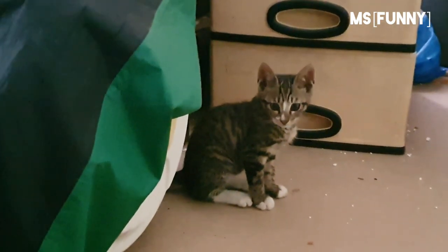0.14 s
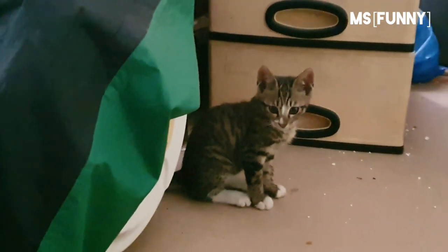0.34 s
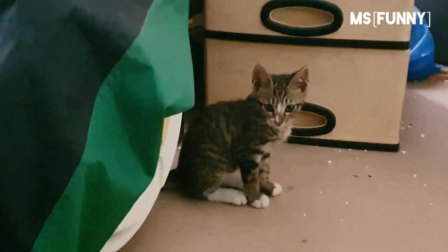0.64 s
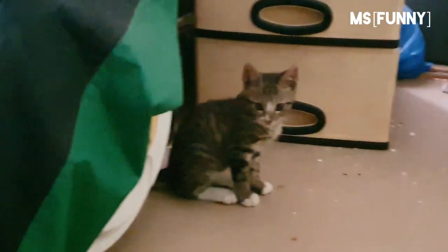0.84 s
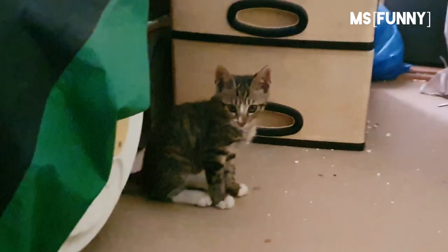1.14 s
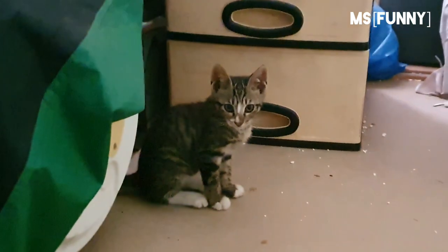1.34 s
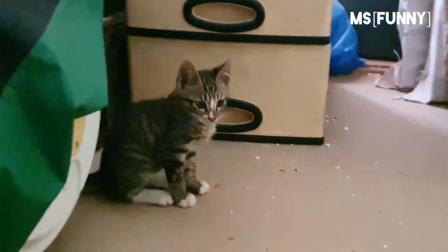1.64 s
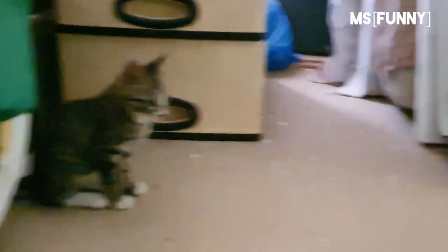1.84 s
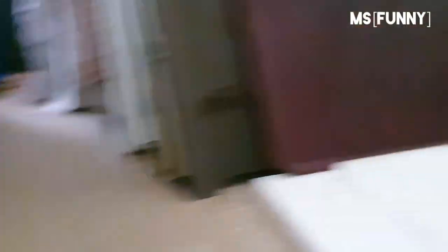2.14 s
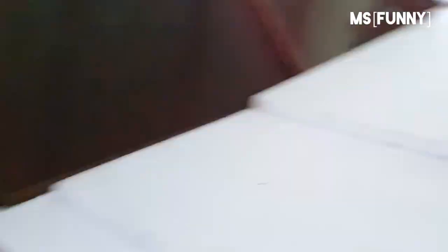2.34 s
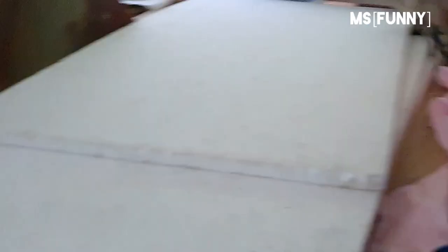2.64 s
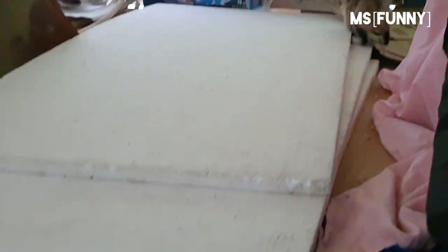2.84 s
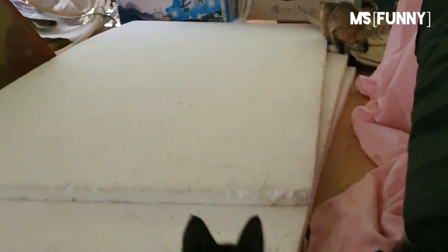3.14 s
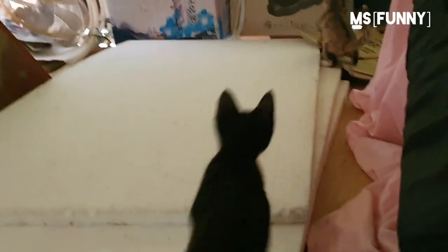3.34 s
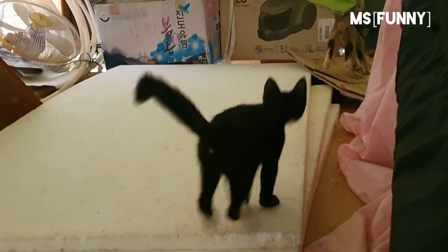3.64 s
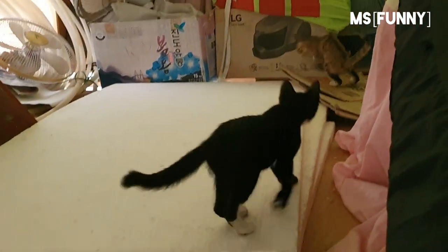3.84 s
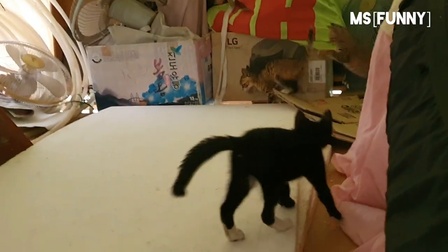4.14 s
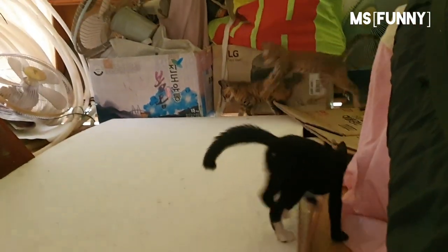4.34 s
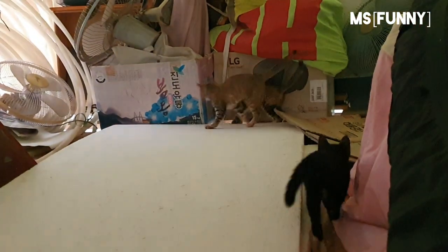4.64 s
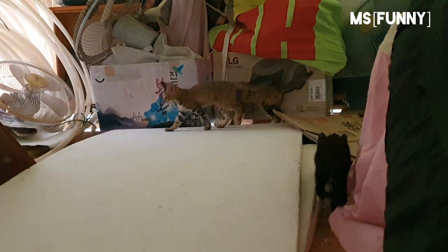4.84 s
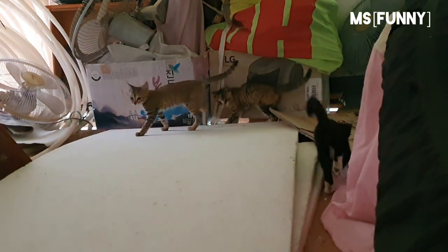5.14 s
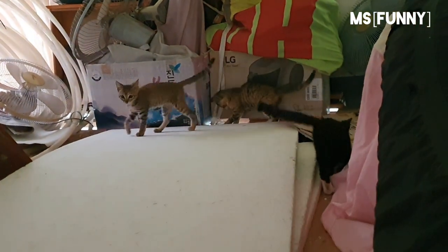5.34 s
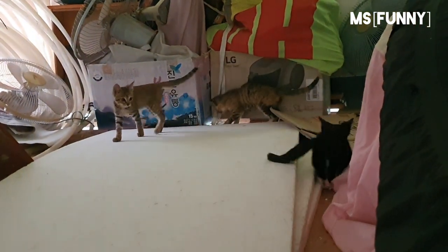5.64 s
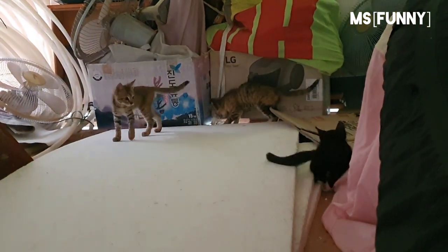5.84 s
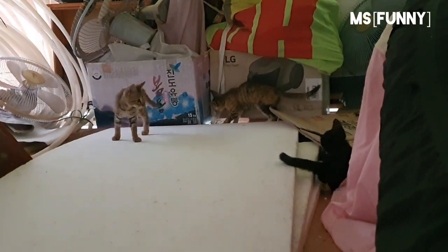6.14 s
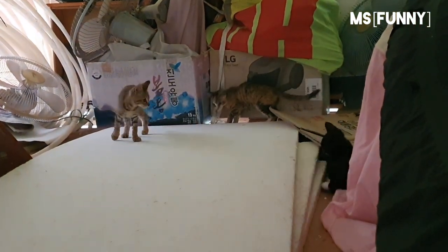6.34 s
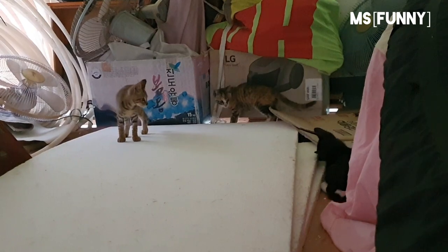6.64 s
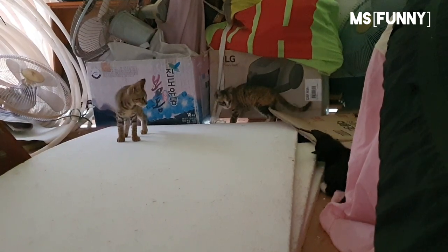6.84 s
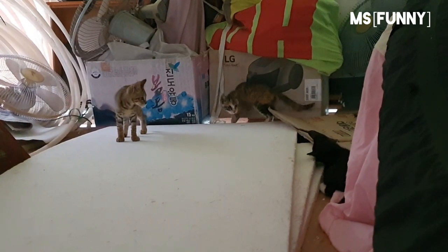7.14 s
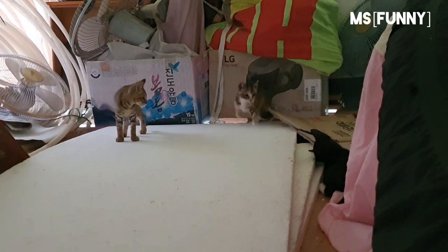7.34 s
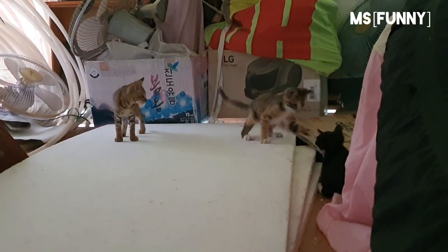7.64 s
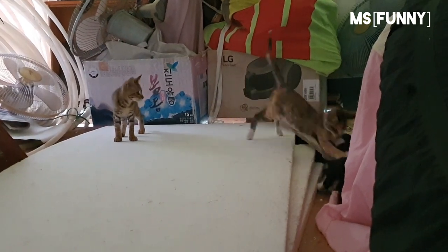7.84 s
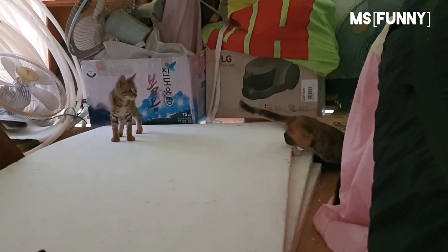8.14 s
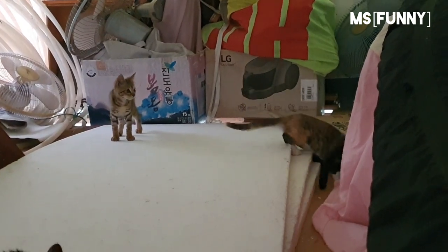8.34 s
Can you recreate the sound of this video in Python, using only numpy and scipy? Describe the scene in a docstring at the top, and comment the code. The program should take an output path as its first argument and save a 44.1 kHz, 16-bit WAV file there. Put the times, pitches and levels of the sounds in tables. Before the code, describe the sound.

In a quiet cluttered room, faint kitten scuffs and bumps come first. Around one and a half seconds the phone creaks in the grip, a finger hisses along it and sharp knocks follow. Then kittens scramble over hollow boards and bedding with thumps, rustles and claw ticks above low handling rumble. One hard knock hits at five seconds, calm follows, then a last burst of scuffling.

```python
"""Scuffs, hollow bumps and tiny ticks: kittens scramble over boards, boxes and bedding in a cluttered storeroom.
Paws ring the modes of boards, boxes and card; scuffs and fur are grainy noise strokes, claws short bright noise.
A handheld phone rumbles, creaks and knocks in the grip, made of lumpy low noise and pulses ringing its case.
A finger slides along it as swelling hiss; beneath lie room air, port hiss and a faint drone of filtered noise."""
import sys
import numpy as np
from scipy import signal
from scipy.fft import rfft, irfft, next_fast_len
from scipy.io import wavfile

SR = 44100
rng = np.random.default_rng(int(sys.argv[2]) if len(sys.argv) > 2 else 0)


def file_out(sig):
    """Save sig as 16-bit WAV at sys.argv[1]."""
    # one column per channel
    cols = np.atleast_2d(sig).T
    # limit, then scale
    lim = np.clip(cols, -1, 1)
    pcm = np.round(lim * 32767).astype(np.int16)
    wavfile.write(sys.argv[1], SR, pcm)


N = 373968
TIME = np.arange(N) / SR

# Likeness of the two ports. Each row: frequency in Hz, left-right correlation from 0 to 1.
PORT_LIKENESS = [(100, 0.98), (500, 0.82), (1200, 0.078), (12000, 0.082)]
# Nearby surfaces ripple the spectrum of each stroke differently: depth, and spacing of the ripple.
RIPPLE_DB, RIPPLE_HZ = 2.8, 130

# Still room air. Each row: frequency in Hz, relative level in dB per Hz.
AIR_COLOUR = [(20, -18), (220, -7.5), (300, -11), (640, -12), (840, -8.5), (1100, -14.5), (4000, -25.5),
              (10000, -19), (16000, -28)]
# The right port hisses on its own.
HISS_BAND_HZ, HISS_DB = (2130, 5370), -70.5
# A faint far drone that swells. Each row: time in seconds, level in dB.
DRONE_LEVEL = [(5.62, -85), (5.76, -68), (5.93, -63), (6.45, -90.5), (8.2, -65)]
DRONE_HZ, DRONE_WIDTH_HZ = 420, 150

# Paws pushing off on cloth and card.
# Each row: time of the peak in seconds, level in dB, rise in seconds, treble tilt in dB per octave.
PUSHES = [(0.342, -50, 0.014, 2), (.414, -52, 0.017, 1.5), (0.488, -43.5, 0.03, 1), (0.932, -50, .007, 4.5),
          (1.061, -55.5, 0.026, 2.5), (1.323, -45.5, .017, 2.4), (1.448, -53.5, 0.021, 4),
          (2.629, -43.5, 0.045, 3), (2.702, -41.5, 0.045, 2), (2.796, -38.5, 0.019, 2.3),
          (3.112, -50, 0.006, 1), (3.396, -43, 0.02, 1.5), (3.491, -38.5, 0.023, 3.5),
          (3.657, -37, 0.044, 2.5), (3.809, -45.5, 0.038, 1), (4.056, -46, 0.038, -0.5),
          (4.228, -47.5, 0.029, 7.5), (4.457, -33.5, .04, 0), (4.72, -38, 0.043, -0.5),
          (5.18, -47.5, 0.036, 0.7), (5.424, -47, 0.02, -0.4), (7.427, -42.5, 0.035, 3),
          (7.61, -34.5, 0.027, -0.5), (7.648, -35.5, 0.022, 2.5), (7.97, -36, 0.029, 3),
          (8.291, -57.5, 0.076, 4)]
# Colour of paws and fur on cloth and card. Each row: frequency in Hz, relative level in dB per Hz.
STROKE_COLOUR = [(100, 14), (350, 14), (580, 17), (850, 11.5), (1250, 6.5), (2000, 4.5), (2700, 4.5),
                 (3700, 2.5), (4800, 4.5), (6200, -3.5), (8000, -1), (13500, 0), (16000, -7.5)]
# A push of the reference level dies in PUSH_T60_S; every 10 dB gentler, it lingers LINGER times as long.
PUSH_DB, PUSH_T60_S, LINGER = -46, 0.2, 0.85
# The clutter scatters each stroke back as a faint tail.
SCATTER_DB, SCATTER_T60_S = -8, 0.49
# Above this the phone shades the left port.
SHADE_HZ = 3000

# Claws catching. Each row: start in seconds, level in dB before the trim in claws().
CLAW_CATCHES = [(0.3359, -35.5), (3.315, -33.5), (3.3783, -28.5), (4.024, -32)]
# Colour of a claw. Each row: frequency in Hz, relative level in dB per Hz.
CLAW_SPECTRUM = [(700, -24), (4000, -10), (14000, 1)]

# Paws landing on boards and boxes.
# Each row: start in seconds, level in dB, centre in Hz, spread in octaves.
LANDINGS = [(0.497, -43, 414, 0.28), (0.762, -49, 111, 1.1), (0.943, -42, 288, 0.65),
            (0.962, -34.5, 109.4, 0.38), (1.049, -47, 243, 1.06), (2.604, -49, 770, 0.6),
            (2.628, -43.5, 150, 2.1), (2.689, -43, 81.6, 1.6), (2.8, -46.5, 201, 2.3),
            (2.963, -44, 94, 0.47), (3.378, -29, 104, 0.72), (3.453, -34.5, 240, 1.13),
            (3.656, -41, 184, 1.2), (3.718, -36.5, 263, 0.51), (3.75, -37.5, 128, 1.13),
            (3.8, -47, 400, 0.86), (3.995, -40, 202, 0.34), (4.088, -43.5, 68.6, 0.54),
            (4.235, -52.5, 182, 0.34), (4.425, -35, 220, 1.16), (4.652, -42.5, 216.7, 1.93),
            (4.693, -35.5, 238, 1.6), (5.062, -44, 212, 1.2), (6.815, -53.5, 305, 0.94),
            (7.259, -53.5, 202.8, 1.1), (7.406, -47, 266, 1.3), (7.61, -28.5, 264.2, 1.61),
            (7.688, -41.5, 115, 1.7), (7.964, -36, 360, 1.2), (7.987, -35.5, 99.6, 0.4)]
# Ring of the boards and boxes. Each row: frequency in Hz, relative level in dB, 60 dB decay in seconds.
PANEL_MODES = [(42.2, 11.5, 0.5), (74.7, 6, 0.27), (93.1, -3, 0.33), (125.3, -1.5, 0.36), (169, 0.5, 0.09),
               (218.3, 2, 0.064), (265, -3, 0.038), (353.8, 2.5, 0.071), (440, 0, 0.014), (604, 4, 0.021),
               (790, 1, 0.067)]
# Contact at a one-octave spread; a wider landing stays on longer, by this power of its spread.
CONTACT_S, SPRAWL_POWER = 0.018, 0.24
# The narrower the spread against THUD_SPREAD, the more thud; its envelope peaks after THUD_CYCLES.
THUD_SPREAD, THUD_CYCLES = 0.47, 1.39

# Bodies brushing along the bedding, each a run of small random strokes.
# Each row: start in seconds, end in seconds, level in dB, treble tilt in dB per octave.
FUR_RUNS = [(0.637, .73, -60.5, 3), (0.972, 1.17, -63, 2), (1.272, 1.3, -51.5, -0.5), (3.191, 3.47, -50, 4),
            (3.615, 3.93, -57.5, 2), (4.523, 4.86, -51, 1.5), (5.072, 5.17, -53, -0.1),
            (5.499, 5.73, -62.5, 3), (6.003, 6.2, -60, 6), (6.876, 6.99, -66, 11), (7.473, 7.88, -53.5, 1)]
STROKES_PER_S, STROKE_RISE_S, STROKE_T60_S, STROKE_UNEVEN_DB = 40, .009, 0.23, 2
# Share of the small strokes in which a claw snags, its level above the stroke, its decay.
SNAG_SHARE, SNAG_DB, SNAG_T60_S = .2, 12, 0.008

# Sharp hits on the phone case: the first is the creak's opening slip, the rest are knocks.
# Each row: time of the pulse turning round in seconds, peak in dB, snap in Hz, case ring in dB beside the snap.
CASE_HITS = [(1.534, -24.5, 780, 2), (2.192, -20.5, 535, -5), (2.3225, -16, 988, -16),
             (2.386, -26.5, 720, -11), (2.413, -30, 826, -14), (2.6261, -11, 527, -17),
             (2.7537, -21, 1044, -22), (2.8637, -19.5, 975, -17), (5.003, -9.5, 828.2, -18),
             (5.011, -19.5, 711, 25)]
# Ring of the phone case. Each row: frequency in Hz, relative level in dB, 60 dB decay in seconds.
CASE_RING = [(89, -0.5, 0.15), (236, 12, 0.022), (483, 7.5, 0.0072)]
# Ring of the small port cavity. Each row: frequency in Hz, relative level in dB.
CAVITY_MODES = [(2900, 28), (11500, 16.5)]
CAVITY_T60_S = 0.00071
# After its opening slip the case creaks in a quickening run: each gap is a share of the one before.
CREAK_START_S, FIRST_GAP_S, GAP_SHARE = 1.559, .035, .885

# A finger sliding by the port. Each row: time in seconds, level in dB.
SLIDE_LEVEL = [(0, -100), (1.5, -80), (2.05, -62.5), (2.46, -57), (3, -106)]
# Hiss of skin on the case. Each row: frequency in Hz, relative level in dB per Hz.
SKIN_COLOUR = [(200, 7), (1300, -12), (4800, -2.5), (6500, -11), (9000, -10), (12500, 0), (16000, -9)]

# The hand carries the phone over the boards. Each row: time in seconds, rumble level in dB.
CARRY_LEVEL = [(2.3, -78), (2.75, -52.5), (3.3, -49.5), (3.9, -51.5), (4.3, -55), (4.85, -55.5), (5.4, -79)]
# Colour of the handling. Each row: frequency in Hz, relative level in dB per Hz.
HAND_COLOUR = [(55, -2), (130, -10.5), (300, -19), (4000, -41.5)]

# Paws slapping down on card. Each row: start in seconds, peak in dB.
CARD_SLAPS = [(3.378, -29.5), (3.453, -26.5), (4.424, -43), (7.262, -49.5), (7.593, -38.5)]
# Ring of the card. Each row: frequency in Hz, relative level in dB. Each mode dies in CARD_CYCLES cycles.
CARD_RING = [(592, -10), (1040, -6.5), (1280, -6.5), (1700, 0.5), (3700, 7.5)]
CARD_CYCLES = 20

# Upper limit of the sound's band.
CUTOFF_HZ = 16100


def from_db(db):
    """Decibels to gain."""
    return 10 ** (np.asarray(db) / 20)


def rms_one(x):
    """Scale to unit rms."""
    return x / np.sqrt(np.mean(x ** 2) + 1e-20)


def lean(right_db):
    """Channel gains for a source that favours the right port."""
    return from_db(np.array([[-right_db], [right_db]]) / 2)


def add(out, s, sound):
    """Mix a sound in, starting at time s."""
    start = round(s * SR)
    lo, hi = max(start, 0), min(start + sound.shape[-1], N)
    out[..., lo:hi] += sound[..., lo - start:hi - start]


def at_hz(points, hz):
    """Read a table on a log-frequency axis."""
    f, value = np.transpose(points)
    return np.interp(np.log(hz), np.log(f), value)


def ride(points):
    """Gain that follows a table of times and levels in dB."""
    return from_db(np.interp(TIME, *np.transpose(points)))


def two_ports(mid, side, hz):
    """Blend shared and opposed sound into two ports, as alike as PORT_LIKENESS gives at hz."""
    alike = np.clip(at_hz(PORT_LIKENESS, hz), 0, 1)
    return np.sqrt(1 + alike) * mid + np.sqrt(1 - alike) * side * [[1], [-1]]


def ring(x, hz, t60):
    """A damped mode: a unit click rings it with height about 1."""
    r, w = from_db(-60 / (t60 * SR)), 2 * np.pi * hz / SR
    return signal.lfilter([0, np.sin(w)], [1, -2 * r * np.cos(w), r * r], x + 1e-18)


def noise(colour, size, tilt_db=0, ripple_db=0):
    """Coloured stereo noise with a random ripple in its spectrum, alike at both ports in the bass; rms 1."""
    n = next_fast_len(size)
    hz = np.maximum(np.fft.rfftfreq(n, 1 / SR), 20)
    mid, side = rfft(rng.standard_normal((2, n)))
    knots = np.arange(0, SR / 2, RIPPLE_HZ)
    ripple = ripple_db * np.interp(hz, knots, rng.standard_normal(len(knots)))
    shape_db = at_hz(colour, hz) + tilt_db * np.log2(hz) + ripple
    return rms_one(irfft(two_ports(mid, side, hz) * from_db(shape_db), n)[:, :size])


def grain(size, per_s, depth_db):
    """Gain of a surface that catches and lets go at random; rms 1."""
    steps = rng.standard_normal(int(size / SR * per_s) + 2)
    place = np.arange(size) / SR * per_s
    return rms_one(from_db(depth_db * np.interp(place, np.arange(len(steps)), steps)))


def background(air_db=-70):
    """Still room air, the hiss of the right port and a far drone in one broad resonance."""
    air = from_db(air_db) * noise(AIR_COLOUR, N) * lean(right_db=3.0)
    port = signal.butter(2, HISS_BAND_HZ, "band", fs=SR, output="sos")
    air[1] += from_db(HISS_DB) * rms_one(signal.sosfilt(port, rng.standard_normal(N)))
    edges_hz = [DRONE_HZ - DRONE_WIDTH_HZ / 2, DRONE_HZ + DRONE_WIDTH_HZ / 2]
    resonance = signal.butter(2, edges_hz, "band", fs=SR, output="sos")
    drone = rms_one(signal.sosfilt(resonance, noise(AIR_COLOUR, N)))
    return air + ride(DRONE_LEVEL) * drone


def stroke(db, rise, t60, tilt_db, fibre_db=1.3, catch_db=1.6):
    """A stroke gathers speed from rest, then dies away; fibres catching make it grainy."""
    t = np.arange(-rise, .45, 1 / SR)
    dying = np.hypot(from_db(-60 * t / t60), from_db(SCATTER_DB - 60 * t / SCATTER_T60_S))
    speed = np.where(t < 0, 1 + t / rise, dying)
    fibres = grain(len(t), 900, fibre_db) * grain(len(t), 110, catch_db)
    return from_db(db) * speed * fibres * noise(STROKE_COLOUR, len(t), tilt_db, RIPPLE_DB)


def scuffs():
    """Paws push off on cloth and card, each push one stroke whose decay time follows its force."""
    out = np.zeros((2, N))
    for s, db, rise, tilt_db in PUSHES:
        t60 = PUSH_T60_S * LINGER ** ((PUSH_DB - db) / 10)
        add(out, s - rise, stroke(db, rise, t60, tilt_db))
    return out


def claws(t60=0.0073, tail_db=-17, tail_t60=0.86, level_db=-5):
    """Tiny bright ticks with a faint scatter from the clutter."""
    out, t = np.zeros((2, N)), TIME[:SR // 4]
    fade = from_db(-60 * t / t60) + from_db(tail_db - 60 * t / tail_t60)
    for s, db in CLAW_CATCHES:
        add(out, s, from_db(db + level_db) * fade * noise(CLAW_SPECTRUM, len(t)))
    return out * lean(right_db=10.0)


def bumps(ring_s=0.025):
    """A neat landing thuds at the pitch of the panel under the paw; a sprawling one stirs the modes around it."""
    out, t = np.zeros((2, N)), TIME[:SR // 2]
    for s, db, centre_hz, spread in LANDINGS:
        contact = CONTACT_S * spread ** SPRAWL_POWER
        push = np.exp(-t / contact / 2)
        boom = np.zeros((2, len(t)))
        for hz, mode_db, t60 in PANEL_MODES:
            mid, side = ring(push * rng.standard_normal((2, len(t))), hz, t60)
            # modes far from the centre are hardly stirred
            reach = 1 / (1 + (np.log2(hz / centre_hz) / spread) ** 2 / 2) ** 2
            boom += from_db(mode_db) * reach * two_ports(rms_one(mid), rms_one(side), hz)
        cycles = t * centre_hz
        thud = cycles * np.exp(-cycles / THUD_CYCLES) * np.sin(2 * np.pi * cycles)
        thud_share = THUD_SPREAD / spread / (1 + spread ** 2)
        landing = rms_one(boom) + thud_share * rms_one(thud)
        # the level counts over the contact and the ring after it
        add(out, s, from_db(db) * rms_one(landing) * np.sqrt((2 * contact + ring_s) / t[-1]))
    return out


def brushes():
    """Fur drags over the bedding in small, uneven strokes; now and then a claw snags."""
    out, t = np.zeros((2, N)), TIME[:SR // 20]
    for start, end, db, tilt_db in FUR_RUNS:
        for s in np.arange(start, end, 1 / STROKES_PER_S):
            at = s + rng.uniform(-.5, .5) / STROKES_PER_S
            stroke_db = db + rng.normal(0, STROKE_UNEVEN_DB)
            add(out, at - STROKE_RISE_S, stroke(stroke_db, STROKE_RISE_S, STROKE_T60_S, tilt_db))
            snag = from_db(stroke_db + SNAG_DB - 60 * t / SNAG_T60_S) * noise(CLAW_SPECTRUM, len(t))
            add(out, at, snag * (rng.random() < SNAG_SHARE))
    return out


def case_hit(snap_hz, ring_db, rattle_db=-12, rattle_t60=0.13):
    """One push-pull pulse with the crack of the port and the rattle and ring of the case; peak 1."""
    t = TIME[:SR // 10]
    snap = np.sin(2 * np.pi * snap_hz * t) * (t * snap_hz < 1)
    # the faster the pulse turns round, the harder the small port cavity cracks
    since = np.maximum(t - .5 / snap_hz, 0)
    crack = sum(from_db(db - 60 * since / CAVITY_T60_S) * np.sin(2 * np.pi * hz * since)
                for hz, db in CAVITY_MODES)
    snap = snap + (snap_hz / CAVITY_MODES[0][0]) ** 2 * crack
    # loose parts repeat the pulse in a dying scatter
    scatter = rng.standard_normal(len(t)) * from_db(-60 * t / rattle_t60)
    rattle = signal.fftconvolve(snap, scatter / np.linalg.norm(scatter))[:len(t)]
    body = sum(from_db(db - 60 * t / t60) * np.sin(2 * np.pi * hz * t) for hz, db, t60 in CASE_RING)
    hit = snap + from_db(rattle_db) * rattle + from_db(ring_db) * body
    return hit / np.abs(hit).max()


def slip_times(count=15):
    """The grip gives way faster and faster, the gaps shrinking geometrically."""
    return CREAK_START_S + FIRST_GAP_S * (1 - GAP_SHARE ** np.arange(count)) / (1 - GAP_SHARE)


def grip(creak_db=-30.5, swell_db_per_s=7, skin_cut_hz=1050, bend_hz=330):
    """Sharp hits and a tightening stick-slip creak travel through the case, almost only to the right port."""
    out = np.zeros(N)
    for s, db, snap_hz, ring_db in CASE_HITS:
        add(out, s - .5 / snap_hz, from_db(db) * case_hit(snap_hz, ring_db))
    # the case bends, so the lows of each slip arrive after its highs: an all-pass
    _, bend = signal.butter(2, bend_hz, fs=SR)
    for s in slip_times():
        # a harder slip is both louder and brighter
        force = from_db(swell_db_per_s * (s - CREAK_START_S) + rng.standard_normal())
        skin = signal.butter(2, min(skin_cut_hz * force ** 2, SR / 4), fs=SR, output="sos")
        slip = signal.sosfilt(skin, case_hit(snap_hz=350, ring_db=-0.5, rattle_db=-17))
        add(out, s, from_db(creak_db) * force * signal.lfilter(bend[::-1], bend, slip))
    return out * from_db([[-27], [0]])


def finger_slide():
    """Skin hisses along the case, swelling and fading, mostly by the right port."""
    return ride(SLIDE_LEVEL) * noise(SKIN_COLOUR, N) * lean(right_db=12.0)


def hand_rumble(lumpy_db=2.2):
    """The moving hand shakes the phone with a low, lumpy rumble."""
    lumps = grain(N, per_s=38, depth_db=lumpy_db)
    return ride(CARRY_LEVEL) * lumps * noise(HAND_COLOUR, N)


def slaps(crackle_db=-19, crackle_t60=0.15, crackle_cut_hz=1500, contact_cut_hz=30000):
    """A paw knocks the card into its woody ring, duller when gentle; a crackle keeps it going as the card gives."""
    out, t = np.zeros((2, N)), TIME[:SR // 4]
    dull = signal.butter(2, crackle_cut_hz, fs=SR, output="sos")
    for s, db in CARD_SLAPS:
        crackle = from_db(crackle_db - 60 * t / crackle_t60) * rng.standard_normal((2, len(t)))
        # the contact's bandwidth falls in proportion to the force
        pad = signal.butter(1, min(contact_cut_hz * from_db(db), SR / 4), fs=SR, output="sos")
        click = t == 0
        drive = signal.sosfilt(pad, click + signal.sosfilt(dull, crackle))
        # neighbouring modes start in opposite directions
        knock = sum((-1) ** k * from_db(mode_db) * ring(drive, hz, CARD_CYCLES / hz)
                    for k, (hz, mode_db) in enumerate(CARD_RING))
        add(out, s, from_db(db) * knock / np.abs(knock).max())
    return out


def shaded(x, right_db=5):
    """The lows reach both ports; the treble favours the right one."""
    lows = signal.sosfilt(signal.butter(1, SHADE_HZ, fs=SR, output="sos"), x)
    return lows + (x - lows) * lean(right_db)


def scene():
    """Everything at the two ports."""
    kittens = shaded(scuffs() + brushes()) + claws() + bumps() + slaps()
    handling = grip() + finger_slide() + hand_rumble()
    return background() + kittens + handling


def record(dry, low_cut_hz=32):
    """The deepest bass is thinned; nothing sounds above CUTOFF_HZ."""
    thinned = signal.sosfilt(signal.butter(2, low_cut_hz, "high", fs=SR, output="sos"), dry)
    return signal.sosfilt(signal.ellip(10, .1, 80, CUTOFF_HZ, fs=SR, output="sos"), thinned)


dry = scene()
out = record(dry)
file_out(out)
```